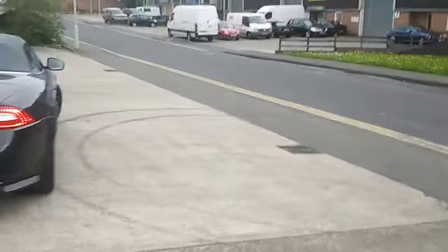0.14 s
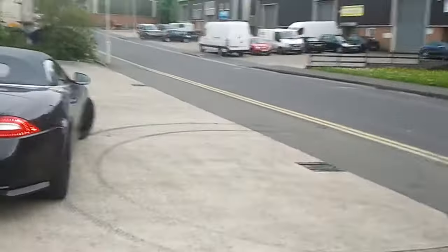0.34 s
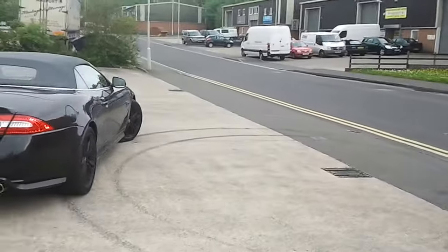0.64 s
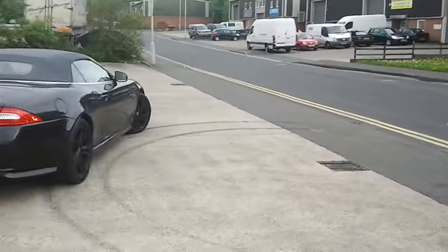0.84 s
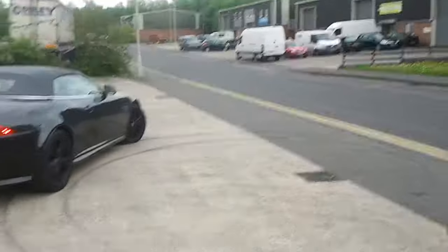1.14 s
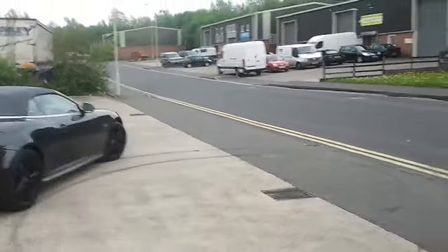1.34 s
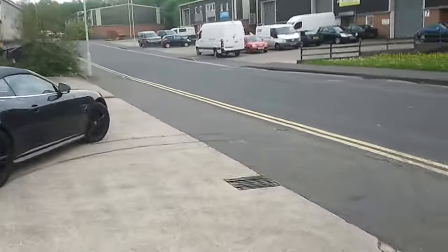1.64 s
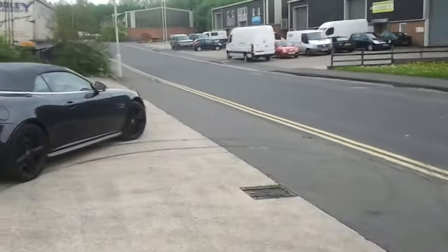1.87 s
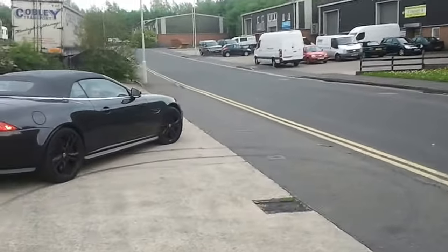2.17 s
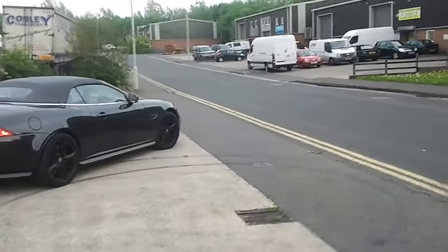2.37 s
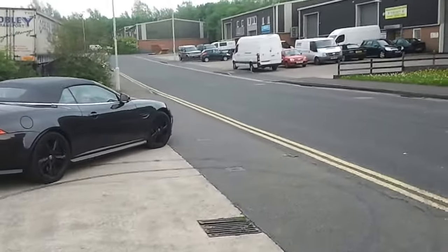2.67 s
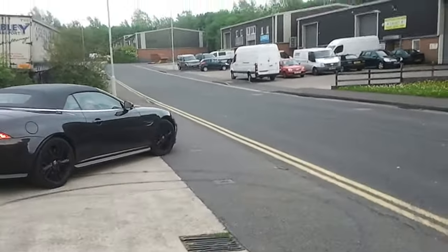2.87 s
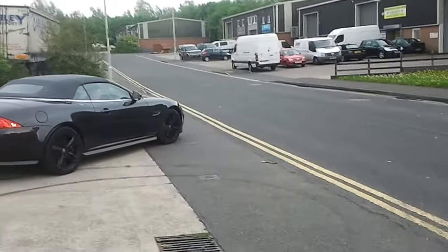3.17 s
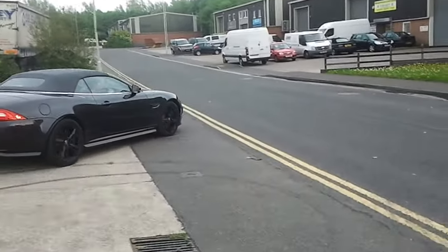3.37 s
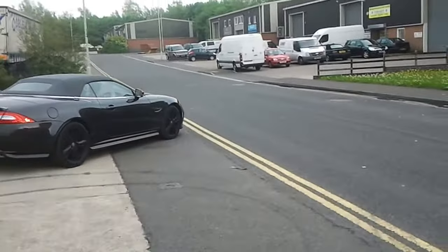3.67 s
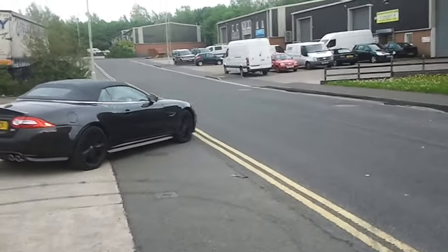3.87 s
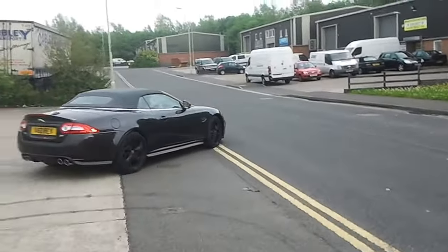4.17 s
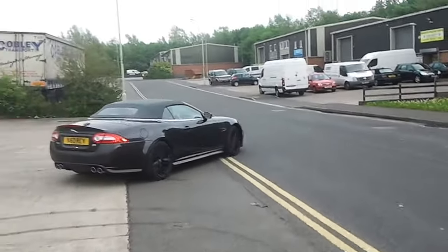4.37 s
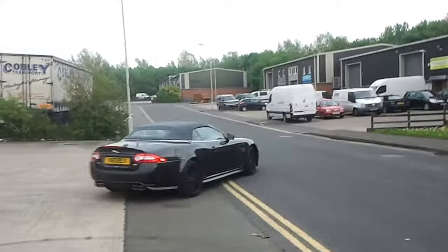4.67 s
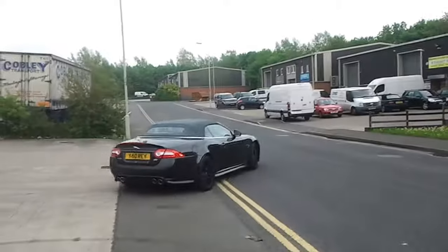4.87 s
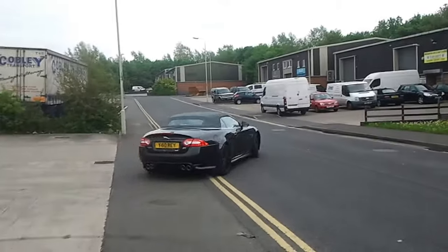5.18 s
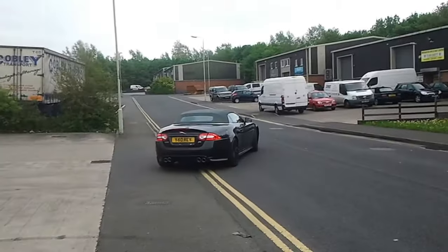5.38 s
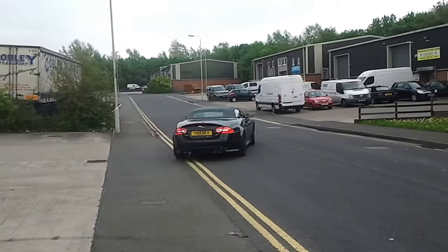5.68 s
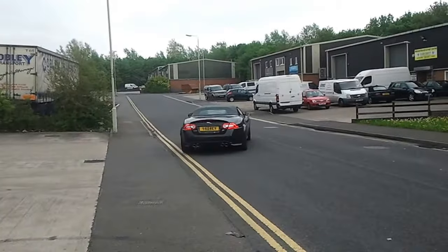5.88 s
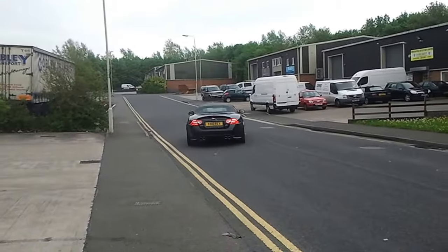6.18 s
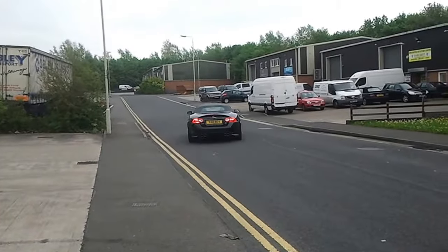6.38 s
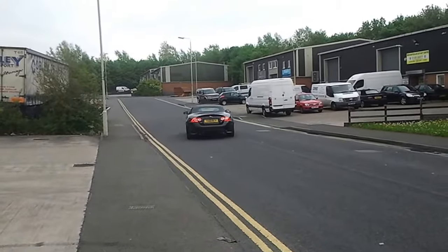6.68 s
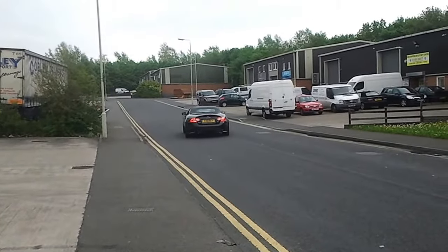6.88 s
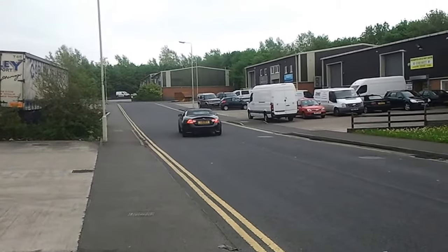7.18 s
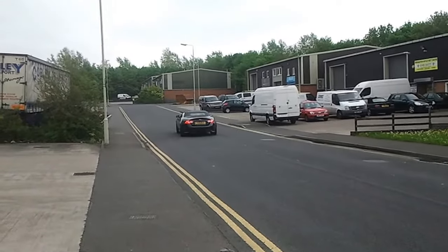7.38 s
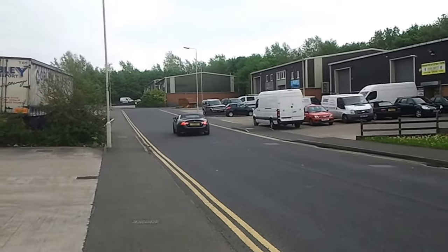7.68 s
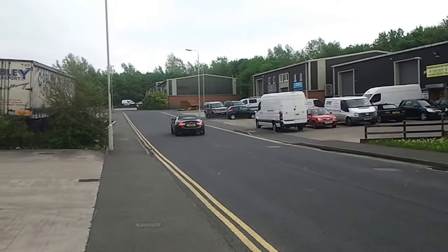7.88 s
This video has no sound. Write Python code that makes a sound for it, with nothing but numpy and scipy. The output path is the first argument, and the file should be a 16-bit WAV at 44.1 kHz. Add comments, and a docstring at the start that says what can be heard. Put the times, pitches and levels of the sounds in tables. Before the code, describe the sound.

Deep lumpy V8 idle with a buzzing metal shield, crackling grit under tyres, then a hard pull up the road climbing to a harsh howl.

```python
"""On a concrete forecourt by a road, a V8 car idles close by, creeps to the kerb, turns and accelerates away.
Tones follow the firing rate, while eight uneven firings a cycle ring the exhaust pipes and blow hissing gas.
A loose exhaust shield rattles, grit cracks under the tyres, which then roll on asphalt, and a faint whine passes.
Wind rumbles at the microphone, low buildings return dull echoes, and the loudest peaks are flattened."""
import sys
import numpy as np
from scipy import signal
from scipy.fft import rfft, irfft
from scipy.io import wavfile
from scipy.ndimage import uniform_filter1d

SR = 44100
rng = np.random.default_rng(int(sys.argv[2]) if len(sys.argv) > 2 else 0)


def generate_wav(sig):
    """Save sig (samples, or channels by samples) to the path in sys.argv[1] as 16-bit PCM at SR."""
    pcm = np.round(np.clip(np.atleast_2d(sig).T, -1, 1) * 32767).astype(np.int16)
    wavfile.write(sys.argv[1], SR, pcm)


N = 353682
T = np.arange(N) / SR    # time in seconds


def from_db(db):
    """Turn decibels into a plain factor."""
    return 10 ** (np.asarray(db) / 20)


def in_time(rows):
    """Draw straight lines between timed rows, giving one curve for each column after the time."""
    s, *columns = np.transpose(rows)
    return [np.interp(T, s, c) for c in columns]


def evened(x):
    """Bring the running loudness (rms over a third of a second) to 1, so that a level curve can set it."""
    return x / np.sqrt(uniform_filter1d(x ** 2, size=SR // 3, mode="reflect") + 1e-20)


def resonance(hz, width_hz):
    """Two-pole filter that rings at one pitch, with a gain of about 1 there; a narrow one rings longer."""
    r = np.exp(-np.pi * width_hz / SR)
    return (1 - r * r) / 2 * np.array([1, 0, -1]), [1, -2 * r * np.cos(2 * np.pi * hz / SR), r * r]


def through(x, modes):
    """Add up resonances side by side, each given as pitch in Hz, width in Hz, level in dB."""
    return sum(from_db(db) * signal.lfilter(*resonance(hz, width), x) for hz, width, db in modes)


def twice(x, modes):
    """Pass the same resonances twice for steep peaks with dark valleys, then even out the loudness."""
    return evened(through(through(x, modes), modes))


def shaped_noise(spectrum):
    """Noise coloured by points of pitch in Hz and relative dB per Hz, brought to an rms of 1."""
    hz, db = np.transpose(spectrum)
    bins = np.log(np.fft.rfftfreq(N, 1 / SR) + 1)
    x = irfft(rfft(rng.standard_normal(N)) * from_db(np.interp(bins, np.log(hz), db)), N)
    return x / x.std()


def drift(rate):
    """Random wandering between points of spread 1, with so many points a second."""
    knots = np.arange(0, N / SR + 1, 1 / rate)
    return np.interp(T, knots, rng.standard_normal(len(knots)))


def air():
    """Steady background noise with its own colour."""
    # Each row: pitch in Hz, relative strength in dB per Hz.
    air_colour = [(35, -10), (70, 1), (120, -6), (200, -15.5), (400, -12.5), (1200, -45), (2400, -45.5),
                  (5000, -38), (10300, -53.5), (12500, -50), (15500, -78.5)]
    return from_db(-39) * shaped_noise(air_colour)


def wind():
    """Wind rumbles at the microphone: lumpy noise at the bottom of the range."""
    # Each row: time in seconds, level in dB around which it drifts.
    wind_level = [(0, -28), (2.75, -42), (2.88, -28), (3.0, -29.5), (4.2, -38.5), (4.8, -26), (5.3, -35.5),
                  (8.02, -53.5)]
    rumble = twice(rng.standard_normal(N), [(31.2, 21.0, 0)])
    return from_db(in_time(wind_level)[0] + 3.0 * drift(3.1)) * rumble


def whine():
    """A thin, faint tone of one pitch fades in and out, its level trembling a little."""
    # One row: start in seconds, end in seconds, pitch in Hz, level in dB before the doubling below.
    start, end, hz, db = (1.25, 1.95, 867, -62)
    swell = np.sin(np.pi * np.clip((T - start) / (end - start), 0, 1))
    return swell * from_db(db + 2.0 * drift(8.3)) * 2 * np.sin(2 * np.pi * hz * T)


def crunch():
    """Grit ground under a tyre: swells of dense uneven grains, coarse or fine, with a smooth sizzle far above."""
    # Each row: start in seconds, length in seconds, crunch level in dB, share of fine grains from 0 to 1,
    # level of the thin treble sizzle in dB.
    swells = [(-.05, 0.24, -45, 0, -58.5), (.274, 0.15, -50, 0, -63), (0.593, 0.27, -42.5, 0.2, -56),
              (1.824, 0.054, -40, 0.3, -79), (2.688, 0.39, -51, 0.1, -63.5), (4.034, 0.054, -37, 0.75, -54),
              (4.126, 0.22, -58, 0.9, -64), (4.982, 0.079, -31, 0, -60), (5.042, 0.036, -24.5, 0, -58)]
    sizes = from_db(3.0 * np.minimum(rng.exponential(1, N), 4)) * rng.choice([-1, 1], N)
    clicks = sizes * (rng.random(N) < 2200 / SR)    # about 2200 grains a second
    dealt = rng.integers(0, 12, N)
    pitches = np.geomspace(1000, 8500, num=12)    # each grain rings a few cycles at one of these, in Hz
    rings = sum(through(clicks * (dealt == k) + 1e-18, [(hz, 0.18 * hz, -1.6 * k)])
                for k, hz in enumerate(pitches))
    coarse = twice(rings, [(2000, 3470, 0)])
    fine = twice(rings, [(4700, 3400, 0)])
    treble = signal.butter(4, [11300, 14500], "band", fs=SR, output="sos")
    sizzle = evened(signal.sosfilt(treble, rng.standard_normal(N)))
    out = np.zeros(N)
    for s, length, crunch_db, share, sizzle_db in swells:
        swell = np.abs(np.sin(np.pi * np.clip((T - s) / length, 0, 1))) ** .5
        inside = (T > s) * (T < s + length)
        grains = coarse + np.clip(share, 0, 1) * (fine - coarse)
        out += swell * inside * (from_db(crunch_db) * grains + from_db(sizzle_db) * sizzle)
    return out


def grit():
    """Grit cracks on the concrete: each grain is a tiny burst of noise in its own band, with a short dull ring."""
    # Each row: time in seconds, peak level in dB, centre of the band in Hz.
    cracks = [(1.225, -26.5, 1400), (1.8526, -24.5, 2960), (2.825, -32, 2500), (2.885, -25, 2600),
              (2.888, -27, 1300), (2.898, -21, 1900), (2.9618, -31, 2600), (2.967, -27.5, 2490),
              (2.974, -23, 2000), (3.9912, -15.5, 980), (4.054, -25, 2170), (4.0627, -25, 3600),
              (4.069, -22, 5250), (4.142, -21.5, 2700), (4.156, -27.5, 2580), (4.167, -27, 3180),
              (4.228, -43, 2600), (4.9767, -16, 1970), (5.006, -15, 1250), (5.033, -15, 2600)]
    out = np.zeros(N)
    t = np.arange(400) / SR
    for s, db, hz in cracks:
        start = round(s * SR)
        band = [(hz, 1.4 * hz, 0)]
        burst = np.exp(-t / 0.0008) * rng.standard_normal(400)
        snap = through(through(burst, band), band)
        ringing = snap + through(snap, [(hz, .3 * hz, -3)])
        snap = signal.lfilter(*signal.butter(2, 5500, fs=SR), ringing)
        out[start:start + 400] += from_db(db) * snap / np.abs(snap).max()
    return out


def tyres():
    """Tread noise in two bands while the car swings onto the asphalt, its level trembling."""
    # Each row: time in seconds, level in dB around which it trembles.
    tread_level = [(4.2, -74), (4.5, -45), (5.6, -39.5), (6.1, -85)]
    rolling = twice(rng.standard_normal(N), [(2756, 260, 0), (3420, 680, -1)])
    return (T > tread_level[0][0]) * from_db(in_time(tread_level)[0] + 1.5 * drift(60)) * rolling


def speed():
    """Firings per second, smoothed because the heavy flywheel cannot change speed abruptly."""
    # Each row: time in seconds, firings per second before smoothing.
    firing_rate = [(0, 53.5), (.5, 49.6), (1, 48.4), (1.5, 44), (2.2, 42.23), (2.4, 46.35), (2.7, 62.66),
                   (2.8, 60.38), (3, 52.63), (3.25, 54.17), (3.6, 49.85), (3.9, 73.08), (4.3, 73.04),
                   (4.6, 99.6), (5.05, 114.33), (5.25, 125), (5.4, 134), (5.65, 145.5), (5.8, 158.5),
                   (6.1, 169.5), (6.4, 198), (6.7, 213.3), (6.85, 226), (7.25, 265), (7.6, 302),
                   (8.02, 346)]
    flywheel_s = .12
    return uniform_filter1d(in_time(firing_rate)[0], size=round(flywheel_s * SR), mode="nearest")


def firings(count, by_cylinder, scatter_db):
    """One click a firing, a little early or late and stronger or weaker, split over two samples."""
    # Delay from unequal pipe lengths, the same each turn of the crank. Each entry: share of a firing interval.
    bank_lag = [0.0098, 0.0938, 0.1182, 0.016]
    jitter = .02    # spread of the moment, as a share of a firing interval
    whole = np.arange(1, int(count[-1]) - 1)
    moments = whole + np.array(bank_lag)[whole % 4] + jitter * rng.standard_normal(len(whole))
    at = np.interp(moments, count, np.arange(N))
    strength = np.array(by_cylinder)[whole % 8] * from_db(scatter_db * rng.standard_normal(len(at)))
    out = np.full(N, 1e-18)
    i = at.astype(int)
    out[i] += strength * (1 - at + i)
    out[i + 1] += strength * (at - i)
    return out


def chatter():
    """The shield buzzes faintly with every firing: each of five pitches is struck with a strength of its own."""
    # Each row: time in seconds, level in dB.
    buzz_level = [(0, -44), (.9, -49), (1.3, -59), (4.0, -61.5), (4.4, -67)]
    count = np.cumsum(speed()) / SR
    # pitch in Hz, width in Hz, level in dB
    modes = [(1200, 170, 2), (1900, 160, 0), (2300, 170, 0), (3200, 150, -4), (3650, 150, -5)]
    rings = np.zeros(N)
    for hz, width, db in modes:
        ring = through(firings(count, np.ones(8), scatter_db=4.5), [(hz, width, db)])
        rings += through(ring, [(hz, 4 * width, 0)])
    return from_db(in_time(buzz_level)[0]) * evened(rings)


def rattle():
    """A loose exhaust shield touches: each touch rings the modes near the one it favours, bent in pitch."""
    # Each row: time in seconds, level in dB, mode favoured (0 low, 1 middle, 2 high, between is a blend).
    touches = [(.114, -36, 2.1), (.151, -32, 2), (0.1891, -23, 0), (0.247, -25, 0), (0.266, -23, 0),
               (.095, -32, 1.1), (0.3248, -25, 1), (0.3663, -29, 0.97), (0.3834, -17.5, 1.1),
               (0.4041, -22, 1.1), (0.4256, -25, 1.24), (0.446, -27, 0.84), (0.468, -31, .85),
               (.483, -33, 0), (0.5259, -29, 1.2), (0.5473, -27, 0.75), (0.567, -30, 1.1),
               (.735, -22, 0.71), (.645, -34, 1), (.668, -33, 0.99), (0.715, -26, 0.8), (0.752, -25, 1),
               (0.8716, -26, 1), (1.1035, -29, 0.95)]
    # Modes of the shield. Each row: pitch in Hz, time to fade by 60 dB in seconds.
    shield = [(1150, 0.017), (2060, 0.031), (3350, 0.023)]
    bend, touch_s = .04, .0012    # spread of pitch from touch to touch as a share; softness of the contact
    out = np.zeros(N)
    t = np.arange(1500) / SR
    for s, db, mode in touches:
        ringing = np.zeros(len(t))
        for k, (hz, t60) in enumerate(shield):
            nearness = np.clip(1 - abs(mode - k), 0, 1)
            bent_hz = hz * (1 + bend * rng.standard_normal())
            ringing += nearness * from_db(-60 * t / t60) * np.sin(2 * np.pi * bent_hz * t)
        out[round(s * SR):][:1500] += from_db(db) * (1 - np.exp(-t / touch_s)) * ringing
    return out


def at_stage(per_s, stage_db):
    """Read a level in dB from its seven values between idle and flat out."""
    # Firings per second at each stage.
    stages = [48.3, 63.1, 107, 137.7, 179, 246, 307]
    return np.interp(per_s, stages, stage_db)


def sines(count, multiples, levels_db, waver_db):
    """Tones locked to the crank, each wavering in level."""
    spread = -.35    # radians: the pipe delays higher tones, which widens each pulse
    out = np.zeros(N)
    for k, db in zip(multiples, levels_db):
        wave = np.cos(2 * np.pi * k * count + spread * k * (k - 1))
        out += np.sqrt(2) * from_db(db + waver_db * drift(14)) * wave
    return out


def firing_tones(count, per_s, level_db, unsteadiness):
    """Tones at multiples of the firing rate, swelling as they glide through pitches the pipes favour."""
    # Each entry: multiple of the firing rate; the fractions are the two banks of cylinders beating.
    multiples = [1, 2, 3, 3 / 4, 5 / 4, 6 / 4, 7 / 4, 9 / 4, 10 / 4]
    # One row for each multiple: dB against the exhaust level at each stage of engine speed.
    multiples_db = [(18, 13, 19.5, 14, 7.5, 17.5, 8), (11.5, 5.5, 12, 2.5, 13, 2.5, -1.5),
                    (6, 8, -19, -13, 1, -3, -22), (-22, -4, -7, -7, -24, -6.5, 8),
                    (-8, -26, -7, -6, 3.5, -3.5, -12), (-10, -3, -20, -12.5, -13, -8.5, 4),
                    (-12, -8, -4.5, 12.5, -7, 4.5, -0.5), (-27, -3, -23, -5, -6, -13, -2),
                    (-27, -11, -18, -31, -2.5, -16, -4.5)]
    # The 4th and 5th multiple, one row each: dB against the exhaust level at each stage.
    top_db = [(4, -16, -4, -14, -3, -9, -17), (-5, -16, -7, -9, -11, -13, -28)]
    # What the pipes favour. Each row: pitch in Hz, gain in dB.
    pipe_gain = [(40, 7.5), (50, 4), (56, 5.5), (65, -4.5), (75, -2.5), (87, -1.5), (100, -8), (120, -19),
                 (150, 1), (185, 6), (230, 4.5), (270, -3.5), (335, 2), (385, -9), (450, 4), (490, 4),
                 (540, 4.5), (635, 3.5), (700, -0.5), (1800, 19)]
    # Waver in dB: when steady, added when unsteady.
    waver_steady, waver_added = (.7, 1.5)
    throb_depth, throb_at = .7, 4.0    # the top tones swell once a cycle, around this firing
    hz, gain_db = np.transpose(pipe_gain)

    def tone_db(orders, rows):
        return [level_db + at_stage(per_s, row) + np.interp(np.log(k * per_s), np.log(hz), gain_db)
                for k, row in zip(orders, rows)]

    waver_db = waver_steady + waver_added * unsteadiness
    tones = sines(count, multiples, tone_db(multiples, multiples_db), waver_db)
    top = sines(count, range(4, 6), tone_db(range(4, 6), top_db), waver_db=4.0)
    throb = 1 + throb_depth * (1 - unsteadiness) * np.cos(2 * np.pi * (count - throb_at) / 8)
    return tones + throb * top


def gas_hiss(puff):
    """Steady coloured noise, stronger just after each firing."""
    # Each row: pitch in Hz, relative strength in dB per Hz.
    hiss_colour = [(880, 2), (1450, -6), (2050, -1.5), (2300, 1.5), (2900, -3), (3640, -18.5), (5500, -18),
                   (8000, -30.5), (12000, -92)]
    return evened(shaped_noise(hiss_colour) * (1.3 + puff))


def burble(count, gas):
    """Low pipe resonances rung only by the unevenness of the firings; the even part is in the tones."""
    # Each entry: relative strength of one of the eight firings of a cycle, in firing order.
    burble_strength = [0.23, 0.22, 3.45, 1.36, 0.7, 1.63, 0.046, 1.34]
    # Each row: pitch in Hz, width in Hz, level in dB.
    burble_modes = [(195, 45, 0), (225, 45, -3)]
    uneven = np.array(burble_strength) - np.mean(burble_strength)
    return twice(firings(count, uneven, scatter_db=1.0) + .003 * gas, burble_modes)


def bark_strikes(count, pulling):
    """Firings that strike the higher pipe resonances, from the lope of the idle to the loaded pattern."""
    # Relative strength of the eight firings of a cycle, first at idle and then under load.
    idle_strength = [1.5, .2, .15, .65, .2, .15, .5, .2]
    load_strength = [.3, .55, .42, .62, .3, .62, .4, .9]
    idle = firings(count, idle_strength, scatter_db=1.5)
    loaded = firings(count, load_strength, scatter_db=2.5)
    return (1 - pulling) * idle + pulling * loaded


def bark(count, strikes, brightness, pulling):
    """Middle pipe resonances, darker or brighter; at idle the other bank rings a lower pipe with a thud."""
    # The darker bark, then the brighter, higher one. Each row: pitch in Hz, width in Hz, level in dB.
    dark_modes = [(438.7, 85, 10), (599, 130, -11)]
    bright_modes = [(489.6, 71, 0.15), (589, 93, -2)]
    # Each entry: relative strength of one of the eight firings in the lower pipe.
    thud_strength = [.6, .55, 1.1, .55, .55, .55, .55, .65]
    # The lower pipe. Each row: pitch in Hz, width in Hz, level in dB.
    thud_modes = [(313.6, 15.6, 0)]
    thud_db = -4    # against the bark, fading out as the engine pulls
    thud = twice(firings(count, thud_strength, scatter_db=1.5), thud_modes)
    barking = (1 - brightness) * twice(strikes, dark_modes) + brightness * twice(strikes, bright_modes)
    return barking + from_db(thud_db) * (1 - pulling) * thud


def rasp(strikes, gas, per_s):
    """Firings and gas noise ring the harsh upper pipe resonances."""
    # Each row: pitch in Hz, width in Hz, level in dB.
    rasp_modes = [(874, 310, -1.5), (1001, 260, 23), (1358, 63, 18), (2283, 76, 17.5)]
    return twice(strikes + 1.3 / per_s * gas, rasp_modes)


def overload_crackle(count):
    """The sharpest exhaust pulses crackle harshly as they overload the input, mostly once a cycle."""
    # Each row: time in seconds, level in dB.
    crackle_level = [(5.9, -72), (6.3, -52), (8.02, -50)]
    # Each entry: relative strength of one of the eight firings.
    crackle_strength = [1.7, .05, .05, .6, .05, .15, .05, .1]
    # Each row: pitch in Hz, width in Hz, level in dB.
    crackle_band = [(3800, 4000, 0)]
    crackles = twice(firings(count, crackle_strength, scatter_db=4.5), crackle_band)
    return from_db(in_time(crackle_level)[0]) * crackles


def engine():
    """The V8: firing tones, and apart from them pipes rung by uneven firings with gas noise blown out."""
    # Each row: time in seconds, share of the brighter, higher bark from 0 to 1,
    # share of added unsteadiness from 0 to 1, bark in dB against the exhaust level.
    character = [(0, 0, 0.8, -2), (.6, 0.32, 0.3, -8), (1.1, 0.72, 0.32, -4), (2.6, 0.2, 0.86, 1.5),
                 (3.7, 0.54, 0.6, 2), (4.2, 0.88, 0.4, 5), (4.6, 0.94, 1, 6.5), (5.6, 0.88, 0.76, 12),
                 (6.1, 0.73, 1, 14.5), (8.02, 0.71, 0.95, 13.5)]
    # How hard the tailpipes blow at the listener. Each row: time in seconds, exhaust level in dB,
    # burble level in dB, gas hiss level in dB.
    exhaust = [(0, -36, -22.5, -45), (.8, -38, -34, -47), (1.3, -41, -53, -49), (1.6, -46.5, -50, -50.5),
               (2.2, -49, -43, -53.5), (2.42, -53, -55, -50.5), (2.54, -44.5, -36.5, -50),
               (2.8, -47.5, -46, -49.5), (2.88, -58, -37, -54), (2.96, -59, -43, -42),
               (3.0, -51.5, -44, -55), (3.1, -41.5, -37.5, -47), (3.6, -44, -44.5, -49),
               (3.75, -44.5, -46, -49), (4.3, -42, -35, -44), (4.65, -35, -33, -37), (5.1, -37, -30.5, -40),
               (5.5, -40, -29.5, -35), (5.9, -34, -23, -37.5), (6.4, -29, -20.5, -38.5),
               (6.8, -26.5, -27.5, -29.5), (7.2, -27.5, -35, -23), (7.6, -29.5, -33, -25.5),
               (8.02, -27, -37, -20)]
    # Firings per second over which the lope of the idle gives way to the loaded pattern: start, end.
    lope_ends = [93, 141]
    # Rasp in dB against the exhaust level at each stage of engine speed.
    rasp_stages = (-45, -35, -5.5, 4.5, -1, 7, 8.5)
    per_s = speed()
    count = np.cumsum(per_s) / SR    # firings so far
    brightness, unsteadiness, bark_db = in_time(character)
    level_db, burble_db, hiss_db = in_time(exhaust)
    pulling = np.interp(per_s, lope_ends, [0, 1])

    # gas rushes out and dies down before the next firing
    puff = np.exp(-3.0 * (count % 1)) * from_db(2.0 * drift(52))
    gas = rng.standard_normal(N) * puff
    strikes = bark_strikes(count, pulling) + (.002 + .65 * unsteadiness * pulling / per_s) * gas

    rung = from_db(burble_db) * burble(count, gas)
    rung += from_db(level_db + bark_db) * bark(count, strikes, brightness, pulling)
    rung += from_db(level_db + at_stage(per_s, rasp_stages)) * rasp(strikes, gas, per_s)
    rung += overload_crackle(count)
    tones = firing_tones(count, per_s, level_db, unsteadiness)
    # each firing swings the signal downwards
    return -tones, from_db(hiss_db) * gas_hiss(puff) - rung


def street(x):
    """Ground and walls return a few delayed copies with the treble dulled."""
    # Each row: delay in seconds, level in dB.
    echoes = [(.011, -7), (.037, -11), (.083, -16), (.149, -21)]
    dull = signal.lfilter(*signal.butter(1, 2500, fs=SR), x)
    out = x.copy()
    for delay_s, db in echoes:
        lag = round(delay_s * SR)
        out[lag:] += from_db(db) * dull[:-lag]
    return out


def scene():
    """Add all the sources; only the pipes and gas hiss get echoes."""
    tones, pipes = engine()
    background = air() + wind() + whine()
    ground = crunch() + grit() + tyres()
    shield = chatter() + rattle()
    return (background + ground + shield + tones + street(pipes))[None]


def record(dry):
    """The microphone loses the deepest rumble, the input stage flattens the loudest peaks; the top is cut."""
    mic_cut_hz, overload, cutoff_hz = 17.4, .722, 15700    # overload: the size that peaks cannot pass
    faded = dry * np.minimum(T / .003, 1)    # fades in over 3 ms
    heard = signal.lfilter(*signal.butter(2, mic_cut_hz, "high", fs=SR), faded)
    squashed = heard / (1 + np.abs(heard / overload) ** 8) ** (1 / 8)
    return signal.sosfilt(signal.cheby2(12, 70, cutoff_hz, fs=SR, output="sos"), squashed)


dry = scene()
out = record(dry)
generate_wav(out)
```